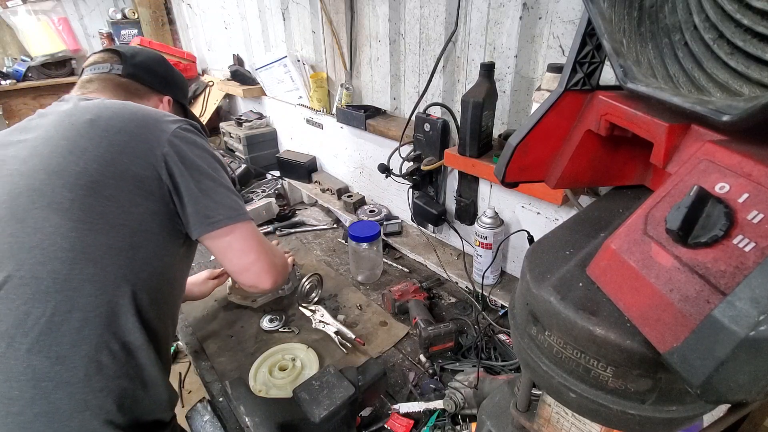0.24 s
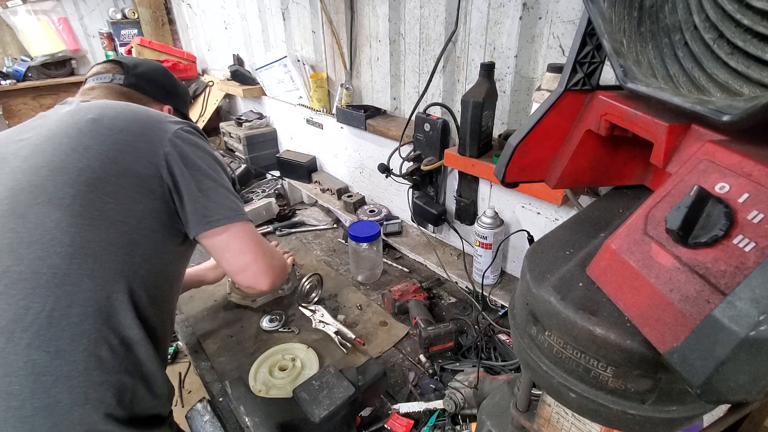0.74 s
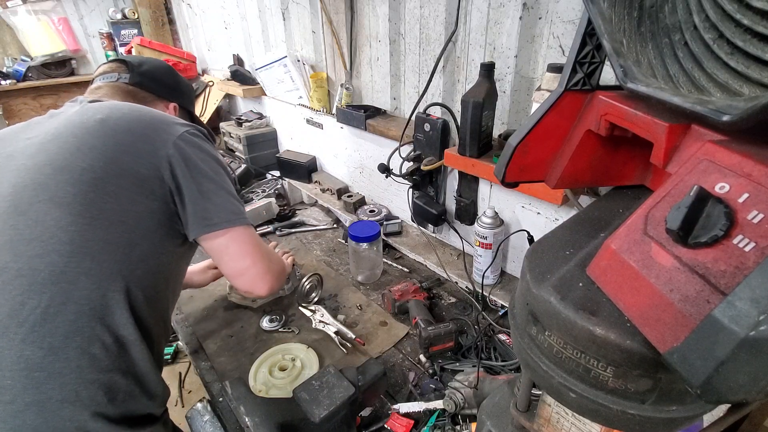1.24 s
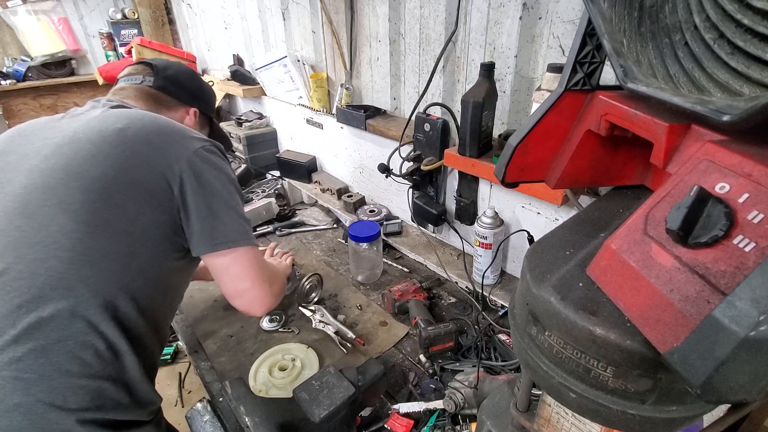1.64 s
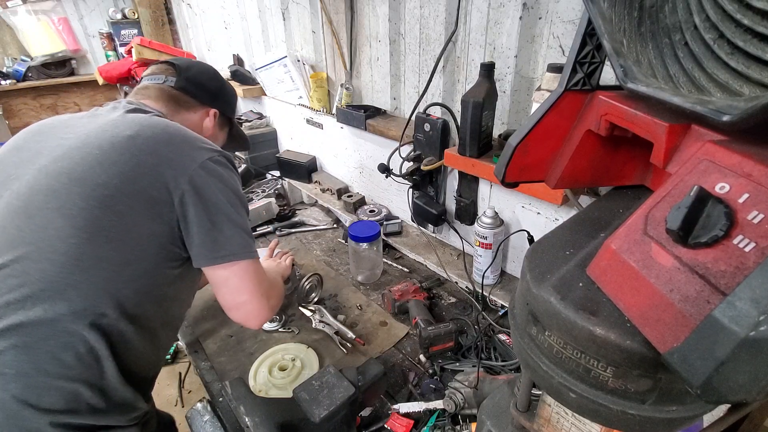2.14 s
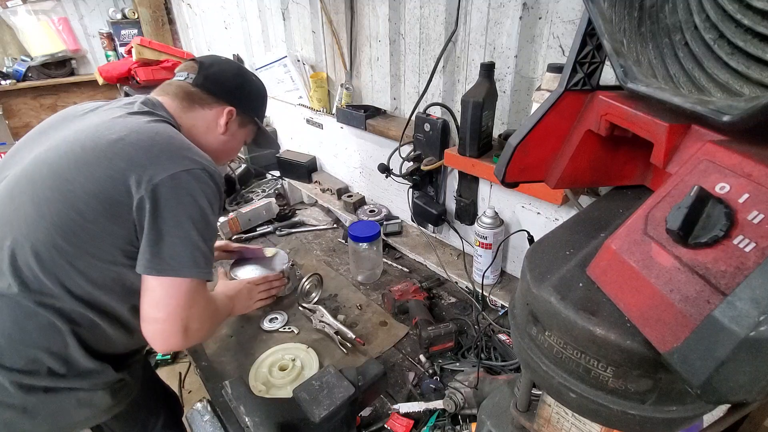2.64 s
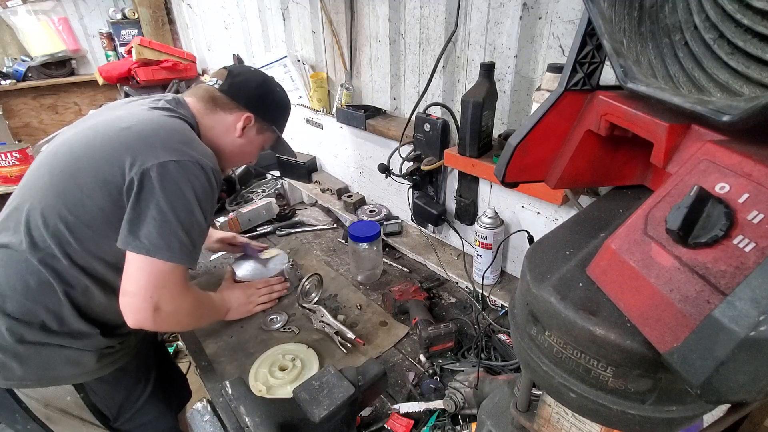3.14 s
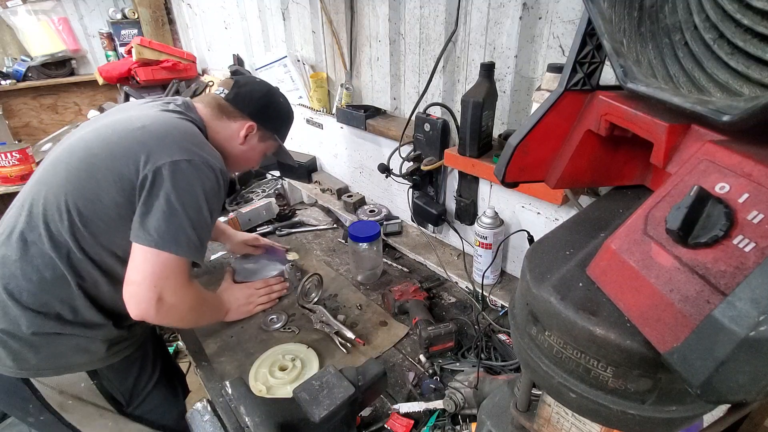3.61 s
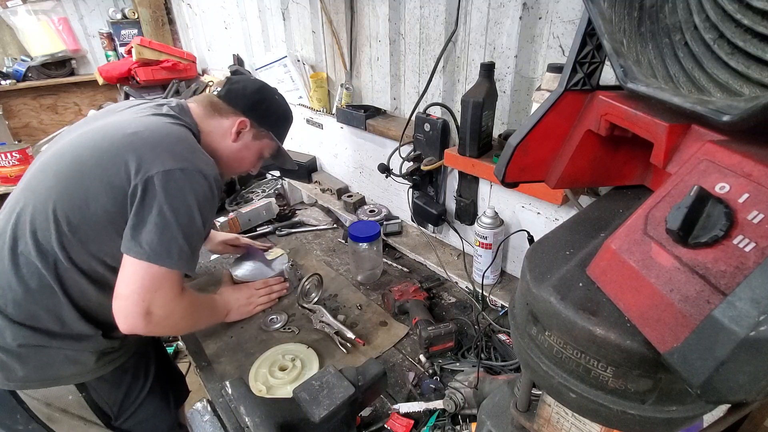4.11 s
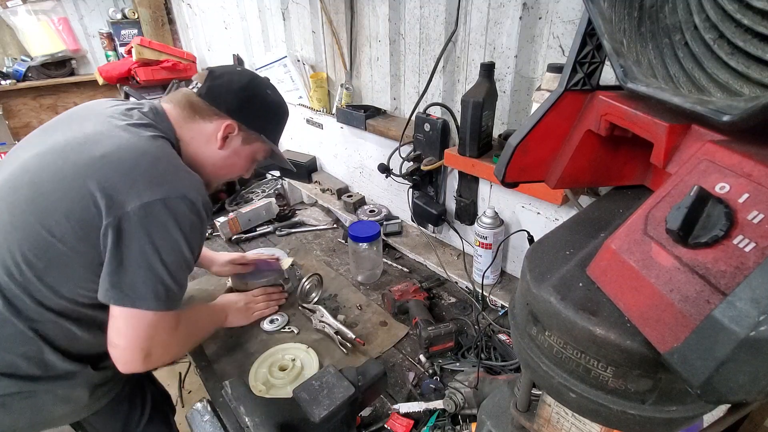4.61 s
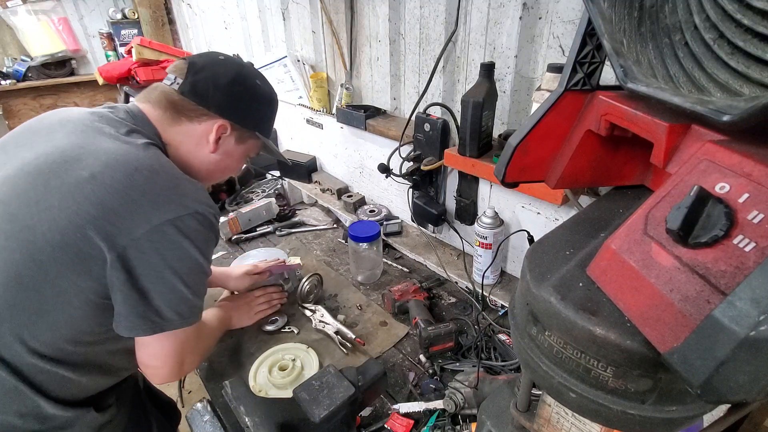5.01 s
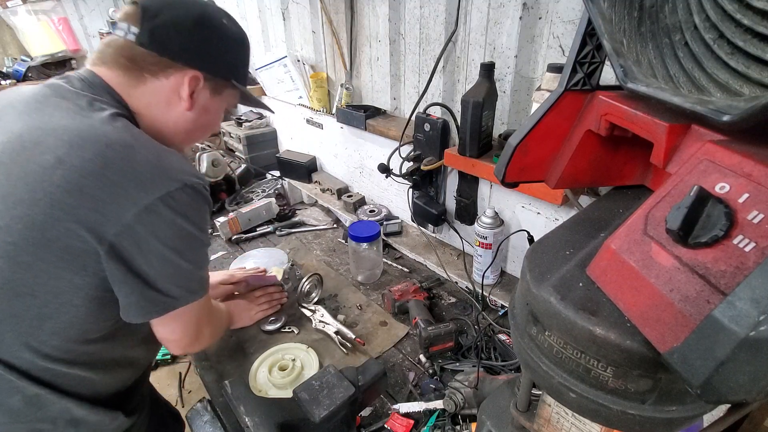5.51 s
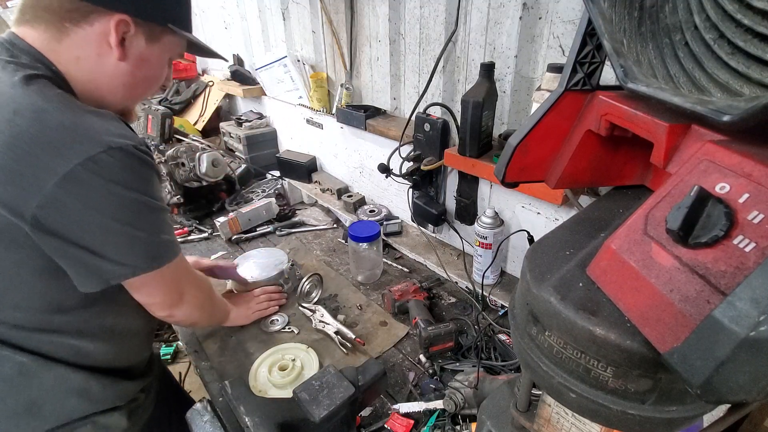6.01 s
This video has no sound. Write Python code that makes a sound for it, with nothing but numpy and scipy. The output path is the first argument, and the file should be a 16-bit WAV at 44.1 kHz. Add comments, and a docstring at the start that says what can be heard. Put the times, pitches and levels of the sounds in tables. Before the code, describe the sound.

In a small workshop, sandpaper scrubs a domed metal cover by hand, about six strokes a second in alternating directions. Each stroke is a bright gritty hiss with a light metallic ring. Early on the cover clacks against the bench and squeaks briefly; midway the strokes grow louder and cleaner, then pause slightly and turn rougher. The last stroke fades slowly. A low mains hum and rumble continue behind. Close single microphone, short dense room.

```python
"""A domed metal cover is sanded by hand on a workbench, in quick back-and-forth strokes, for six seconds.
Throughout, fine grit hisses as filtered noise and coarse grit rings the cover as random blows on resonators.
From about one second on, stick-slip squeaks, judder and knocks of the cover on the bench come and go;
the knocks become rare and faint before the hand lifts off in a last, slowly fading stroke.
Behind it all a mains-driven machine hums and rumbles as sine lines and coloured noise; one microphone."""
import sys
import numpy as np
from scipy import signal
from scipy.fft import rfft, irfft
from scipy.io import wavfile
from scipy.ndimage import map_coordinates

SR = 44100
rng = np.random.default_rng(int(sys.argv[2]) if len(sys.argv) > 2 else 0)


def wav_out(sig):
    """Save sig, one row per channel (or a flat mono array), as 16-bit PCM at SR to the path in sys.argv[1]."""
    wavfile.write(sys.argv[1], SR, np.round(np.clip(np.atleast_2d(sig).T, -1, 1) * 32767).astype(np.int16))


N = 276066
TIME = np.arange(N) / SR


def from_db(db):
    """Logarithmic level: decibels to amplitude gain."""
    return 10 ** (np.asarray(db) / 20)


def rms_one(x):
    """Normalisation: scale to unit rms."""
    return x / np.sqrt(np.mean(x ** 2) + 1e-20)


def in_time(curve):
    """Linear interpolation: each column of a time table at every sample."""
    s, *columns = np.transpose(curve)
    return [np.interp(TIME, s, column) for column in columns]


def swell(middle_s, half_s):
    """Smooth envelope: a short flat-topped rise and fall."""
    distance = np.minimum(np.abs(TIME - middle_s) / half_s, 4)
    return np.exp(-.5 * distance ** 4)


def flutter(per_s):
    """Bounded random modulation: lines between random values, at unit rms."""
    knots = rng.uniform(-1, 1, N // 20)
    return rms_one(np.interp(TIME * per_s, np.arange(len(knots)), knots))


def grains(per_s, spread_db):
    """Random impulse train: grit catches at chance moments with uneven force; rms 1."""
    force_db = spread_db * np.minimum(rng.exponential(1, N), 4)
    sizes = from_db(force_db) * rng.choice([-1, 1], N)
    return rms_one(sizes * (rng.random(N) < per_s / SR))


def coloured(x, spectrum):
    """Spectral shaping: weight a steady signal's frequencies; rms 1."""
    hz, db = np.transpose(spectrum)
    bins = np.maximum(np.arange(N // 2 + 1) * SR / N, 1)
    gain = from_db(np.interp(np.log(bins), np.log(hz), db))
    return rms_one(irfft(rfft(x) * gain, N))


def resonate(x, modes):
    """Modal superposition: damped two-pole resonances in parallel."""
    out = np.zeros(N)
    for hz, width, db in modes:
        r = np.exp(-np.pi * width / SR)
        poles = [1, -2 * r * np.cos(2 * np.pi * hz / SR), r * r]
        # the tiny offset keeps the filter away from denormal numbers
        mode = (1 - r * r) / 2 * signal.lfilter([1, 0, -1], poles, x + 1e-18)
        out += from_db(db) * mode
    return out


def travelling(x, modes, wander_db):
    """Varying modal excitation: each resonance swells and fades as the paper travels over the metal."""
    return sum(resonate(x, [mode]) * from_db(wander_db * flutter(per_s=16)) for mode in modes)


# pushes and pulls in turn, a push first: start_s (break-away), rise_s (speeding up), hiss_db (relative)
STROKES = [(-.052, .035, -26), (0.087, 0.015, -26), (0.235, 0.06, -24), (0.366, 0.047, -26),
           (.519, 0.06, -24.5), (.659, 0.05, -27.5), (0.819, 0.072, -22.5), (.97, 0.07, -22.5),
           (1.12, .025, -25.5), (1.288, 0.017, -26.5), (1.437, 0.081, -22.5), (1.61, .004, -25),
           (1.779, 0.061, -23.5), (1.943, 0.048, -24.5), (2.11, .04, -24), (2.254, 0.022, -26),
           (2.416, 0.052, -23), (2.612, 0.046, -26), (2.805, 0.054, -21), (2.989, 0.031, -22),
           (3.148, 0.054, -19.5), (3.297, 0.011, -20), (3.442, .037, -19.5), (3.576, 0.017, -20),
           (3.715, .04, -20), (3.862, .012, -20.5), (4.007, 0.053, -20.5), (4.174, 0.016, -23),
           (4.345, .11, -24), (4.722, 0.081, -20.5), (4.902, 0.016, -21.8), (5.067, 0.038, -25),
           (5.249, 0.022, -24), (5.386, 0.0057, -22), (5.541, 0.034, -24.5), (5.722, 0.05, -23.5),
           (5.947, 0.051, -24)]
LAST_STROKE_END_S = 6.223
# the hand brakes harder at the end of a push than of a pull, and lifts off slowly after the last stroke
PUSH_BRAKE_S, PULL_BRAKE_S, LIFT_OFF_S = 0.051, .065, .125
# the paper bites as a pull breaks away: extra hiss and its decay time
BITE_DB, BITE_S = 1.5, 0.012


def hand(slip_s=0.002, first_speed=0.43):
    """Kinematics of a reversing stroke: relative speed, place (-.5 rim side, .5 crown), hiss level in dB."""
    rows = np.array(STROKES)
    turns = np.append(rows[:, 0], LAST_STROKE_END_S)
    k = np.clip(np.searchsorted(turns, TIME) - 1, 0, len(rows) - 1)
    start, rise, hiss_db = rows[k].T
    pushing = k % 2 == 0
    since = np.maximum(TIME - start, 0)
    left = turns[k + 1] - TIME
    # the paper sticks at the turn, breaks away at once, then gathers speed
    breaking_away = 1 - np.exp(-since / slip_s)
    gathering = first_speed + (1 - first_speed) * np.sin(np.pi / 2 * np.clip(since / rise, 0, 1))
    brake = np.select([k == len(rows) - 1, pushing], [LIFT_OFF_S, PUSH_BRAKE_S], PULL_BRAKE_S)
    slowing = np.sin(np.pi / 2 * np.clip(left / brake, 0, 1)) ** 2
    speed = breaking_away * gathering * slowing
    progress = np.clip(since / (since + left), 0, 1)
    place = (progress - .5) * np.where(pushing, 1, -1)
    bite_db = np.where(pushing, 0, BITE_DB * np.exp(-since / BITE_S))
    return speed + 1e-6, place, hiss_db + bite_db


# spectrum of the even hiss of fine grit: pitch_hz, level_db (per Hz, relative)
GRIT = [(200, -22), (600, -29.5), (1000, -23), (1500, -28), (2500, -6.5), (3100, -2.5), (4300, 1),
        (5300, 3.5), (6000, 1), (7000, 2.5), (8300, 2.5), (9900, -6), (12000, -8)]
# broad resonances of the paper under the fingers: pitch_hz, width_hz, level_db (relative)
PAPER = [(2050, 450, -3), (3380, 260, 0), (3756, 600, 0), (4925, 810, 1.5), (6680, 550, 0.5),
         (7330, 760, -13.5), (9000, 430, -1)]


def hiss(speed, hiss_db, treble_db, level_db=2.0, paper_db=0.0, split_hz=5500, uneven_db=1.0, bright_db=-1.5):
    """Friction noise of countless grains: treble grows more steeply with speed, so mid-stroke is brightest."""
    fine = coloured(grains(per_s=18000, spread_db=0.0), GRIT)
    paper = rms_one(travelling(grains(per_s=10000, spread_db=2.0), PAPER, wander_db=4.5))
    both = rms_one(fine + from_db(paper_db) * paper)
    low = signal.sosfiltfilt(signal.butter(2, split_hz, fs=SR, output="sos"), both)
    treble = (both - low) * from_db(treble_db + bright_db)
    stroke = low * speed ** 0.91 + treble * speed ** 2.64
    return from_db(level_db + hiss_db + uneven_db * flutter(per_s=110)) * stroke


# resonances of the hand-damped cover, before the grip shifts them: pitch_hz, width_hz, level_db (relative)
COVER = [(1610, 67, -3), (1883, 65, 6), (2015, 94, 8.5), (2255, 98, 9), (2390, 55, -30.5),
         (2764, 270, -1.5), (3080, 79, -4.5), (3980, 130, -11), (4470, 100, -40)]


def coarse_grit(speed, coarse_db, pitch, level_db=-3.0, uneven_db=2.5, shift=.015):
    """Impulsive modal excitation: larger grains ring the cover; the moving grip shifts its pitch a little."""
    ring = travelling(grains(per_s=2800, spread_db=2.0), COVER, wander_db=2.0)
    ring = signal.sosfilt(signal.butter(2, 1300, "high", fs=SR, output="sos"), ring)
    # reading the ring faster or slower raises or lowers its pitch
    position = np.cumsum(pitch + shift * flutter(per_s=15))
    gripped = map_coordinates(ring, [position], order=3, mode="wrap")
    level = from_db(level_db + coarse_db + uneven_db * flutter(per_s=100))
    return rms_one(gripped) * speed ** 0.71 * level


# a push that starts at the rim catches briefly
CATCH_DELAY_S, CATCH_HALF_S = 0.02, .016


def catches(reach):
    """Momentary sticking: the paper catches just after each push begins, much harder nearer the rim."""
    return reach ** 2 * sum(swell(start + CATCH_DELAY_S, CATCH_HALF_S) for start, _, _ in STROKES[::2])


# the paper sticks and slips with a ringing rasp: middle_s, half_length_s, pitch_hz (mean), level_db (relative)
SQUEAKS = [(1.036, 0.011, 4500, -25), (1.077, .0025, 2390, -19), (1.157, 0.0094, 4500, -23.5),
           (1.163, 0.016, 2000, -21), (3.947, 0.015, 2050, -27.5), (4.545, .05, 3380, -26),
           (5.181, .0056, 3450, -20.5), (5.188, 0.0026, 4610, -16), (6.019, .012, 2000, -26)]
CATCH_HZ, CATCH_SQUEAK_DB = 2080, -21.5


def squeaks(catch, level_db=0.5, jitter=.085, rough_db=3.5):
    """Stick-slip oscillation near one resonance: a rough tone whose pitch never holds still."""
    cycles = np.cumsum(1 + jitter * flutter(per_s=1000)) / SR
    rough = np.sqrt(2) * rms_one(from_db(rough_db * flutter(per_s=1400)))
    tones = from_db(CATCH_SQUEAK_DB) * catch * np.sin(2 * np.pi * CATCH_HZ * cycles)
    for middle, half, hz, db in SQUEAKS:
        tones += from_db(db) * swell(middle, half) * np.sin(2 * np.pi * hz * cycles)
    return from_db(level_db) * rough * tones


# the paper drags and the cover judders: middle_s, half_length_s, bench_db (relative), rasp_db (relative)
JUDDERS = [(1.188, 0.013, -28, -37), (2.169, 0.0054, -22.5, -24), (4.663, 0.04, -33.5, -43),
           (4.833, 0.0048, -26, -35), (5.138, 0.0064, -26.5, -32), (5.202, 0.022, -24.5, -40),
           (5.293, .013, -31.5, -21), (5.588, .015, -28.5, -16.5), (5.63, 0.0087, -29.5, -30),
           (5.834, 0.023, -23.5, -18), (6.044, 0.033, -23, -16.5)]
# resonances of the bench under the cover: pitch_hz, width_hz, level_db (relative)
BENCH = [(504, 51, 2), (599, 37, -4.5), (777, 96, 5.5), (924, 110, 0), (1090, 9.2, -6.5), (1370, 230, -5)]
# dull thud of the cover's rim against the bench: pitch_hz, width_hz, level_db (relative)
THUD = [(321, 113, 7), (428, 150, -6)]
# share of each catch that shakes the bench and that rasps
CATCH_BENCH_DB, CATCH_RASP_DB = -27, -38.5


def judder(speed, catch, bench_db, thud_db, level_db=-4.5, rasp_db=-5.5,
           rattle_db=-4.5, rattle_hz=1300, rattle_width_hz=900):
    """Coupled vibration: rubbing shakes the bench through the cover; where the paper drags it rattles and rasps."""
    rocking = from_db(CATCH_BENCH_DB) * catch
    drag = from_db(CATCH_RASP_DB) * catch
    for middle, half, rock_db, drag_db in JUDDERS:
        burst = swell(middle, half)
        rocking += from_db(rock_db) * burst
        drag += from_db(drag_db + rasp_db) * burst
    shake = np.hypot(speed ** 0.24 * from_db(bench_db), rocking)
    taps = grains(per_s=1500, spread_db=1.5)
    bench = travelling(taps * shake, BENCH, wander_db=2.5) / np.std(resonate(taps, BENCH))
    thud = resonate(taps * shake * from_db(thud_db), THUD) / np.std(resonate(taps, THUD))
    # the rocking rim chatters against the bench top
    rim = [(rattle_hz, rattle_width_hz, 0)]
    chatter = rms_one(resonate(resonate(grains(per_s=1200, spread_db=6.5), rim), rim))
    rattle = from_db(rattle_db) * rocking * chatter
    rasp = drag * rms_one(resonate(grains(per_s=4700, spread_db=2.5), PAPER))
    return from_db(level_db) * (bench + thud + rattle) + rasp


# the cover knocks on the bench: start_s, level_db (first touch, relative)
KNOCKS = [(0.859, -6), (1.0745, -4.5), (1.0768, -15), (1.133, -10), (1.141, -8), (1.4311, -1.5),
          (1.7646, -9.5), (2.056, -7.5), (2.168, -13), (2.373, -9), (4.653, -20), (5.214, -19.5)]


def knocks(level_db=-1.0, bench_db=-9.5, contact_hz=3200, rim_hz=2000, rim_width_hz=240, rim_db=-2.0,
           bounce_s=.0016, bounce_db=-5.0, count=4):
    """Impact and rebound: the rim drops, and a clack with quick, dying bounces rings cover and bench."""
    contact = signal.butter(4, contact_hz, fs=SR, output="sos")
    blow = signal.sosfilt(contact, signal.unit_impulse(N) + 1e-18)
    clack = resonate(blow, COVER + [(rim_hz, rim_width_hz, rim_db)])
    ring = (clack + from_db(bench_db) * resonate(blow, BENCH))[:SR // 10]
    blows = np.zeros(N)
    all_gaps = rng.uniform(.5, 2, (len(KNOCKS), count))
    for (s, db), gaps in zip(KNOCKS, all_gaps):
        touches = s + bounce_s * (np.cumsum(gaps) - gaps[0])
        touch_db = db + level_db + bounce_db * np.arange(count)
        blows[np.round(touches * SR).astype(int)] += from_db(touch_db)
    return signal.fftconvolve(blows, ring / np.abs(ring).max())[:N]


def workshop(x, t60=0.23, room_db=-11.5, first_echo_s=0.0026, moves_per_s=9.0, count=8):
    """Reverberation: a short, dense tail whose reflections keep changing as hand and body move."""
    t, wet = TIME[:SR // 3], np.zeros(N)
    for k in range(count):
        tail = rng.standard_normal(len(t)) * from_db(-60 * t / t60) * (t > first_echo_s)
        # the tails take turns, each cross-fading into the next
        away = np.abs((TIME * moves_per_s - k) % count - count / 2)
        share = np.cos(np.pi / 2 * np.minimum(away, 1))
        wet += signal.fftconvolve(x * share, tail / np.linalg.norm(tail))[:N]
    return x + from_db(room_db) * wet


# mains hum, before its slight waver: pitch_hz, level_db (rms)
HUM = [(60, -28), (120, -42), (240, -50.5)]
# spectrum of the machine's low rumble in the room: pitch_hz, level_db (per Hz, relative)
RUMBLE = [(20, -35), (40, -25), (48, -16.5), (58, -3), (80, -3), (95, 1), (110, -3), (130, -1.5), (165, -9),
          (200, -14.5), (400, -25), (1000, -27.5), (4000, -40.5), (11000, -46.5)]
RUMBLE_DB = -37  # rms


def machine(waver=0.034):
    """Harmonic and broadband radiation: mains lines, wavering slightly in level, over a low rumble."""
    lines = np.zeros(N)
    for hz, db in HUM:
        lines += from_db(db) * np.sqrt(2) * np.sin(2 * np.pi * (hz * TIME + rng.random()))
    rumble = from_db(RUMBLE_DB) * coloured(rng.standard_normal(N), RUMBLE)
    return lines * (1 + waver * flutter(per_s=7.0)) + rumble


# level of the machine's wavering drone: start_s, level_db (rms)
DRONE = [(0, -35.5), (.3, -34.5), (1.4, -45), (2.0, -38), (3.1, -33.5), (3.6, -41), (5.2, -50), (6.25, -50)]
# the resonance that carries the drone: pitch_hz, width_hz, level_db (relative)
DRONE_MODE = [(139.4, 9.8, 0)]


def drone(level_db=0.0):
    """Narrow-band resonance: noise filtered twice by one mode, swelling and fading."""
    band = rms_one(resonate(resonate(rng.standard_normal(N), DRONE_MODE), DRONE_MODE))
    return band * from_db(level_db + in_time(DRONE)[0])


# how the paper lies on the dome:
# start_s, reach (towards the rim, 0-1), coarse_db (relative), treble_db (relative)
GRIP = [(0, 0.68, -24, -.5), (.6, 0.82, -24.5, -3), (1.2, 0.95, -21, -3), (1.6, 0.74, -27.5, -0.5),
        (2.2, 1, -27.5, -1), (2.72, 0.18, -34.5, 0), (3.45, 0.74, -23.5, 0.2), (3.9, 0.73, -22.5, -1.8),
        (4.35, 0.06, -27.5, -0.7), (5.25, 0.23, -36, -1.5), (6.0, 0.43, -26.5, 4.2)]
# how the cover sits on the bench:
# start_s, bench_db (ring, relative), thud_db (against the ring), pitch (factor of the gripped cover)
CONTACT = [(0, -37.5, -9, 1.015), (1.1, -35.5, -5.5, 1.03), (2.2, -41.5, -3, 1.02), (2.7, -44.5, -2, 1.04),
           (3.1, -42.5, 1.5, 0.93), (3.55, -45.5, 2, 1.03), (4.0, -40.5, -3.5, 1.0), (4.5, -44.5, -4, 0.95),
           (5.0, -38, -7, .91), (5.6, -35.5, -9, 0.92), (6.2, -39.5, -19, 0.95)]
# from rim to crown the hiss grows and brightens and the coarse grit fades; reach scales the last two
CROWN_HISS_DB, CROWN_TREBLE_DB, CROWN_COARSE_DB = 0.5, 3.5, -6.5


def scene():
    """Superposition: the sanding in its room, over the hum; both channels alike."""
    speed, place, hiss_db = hand()
    reach, coarse_db, treble_db = in_time(GRIP)
    bench_db, thud_db, pitch = in_time(CONTACT)
    reach = np.clip(reach, 0, 1)
    catch = catches(reach)
    fine = hiss(speed, hiss_db + CROWN_HISS_DB * place, treble_db + CROWN_TREBLE_DB * reach * place)
    coarse = coarse_grit(speed, coarse_db + CROWN_COARSE_DB * reach * place, pitch)
    cover = judder(speed, catch, bench_db, thud_db) + knocks()
    sanding = workshop(fine + coarse + squeaks(catch) + cover)
    return np.tile(sanding + machine() + drone(), (2, 1))


CUTOFF_HZ = 10100


def record(dry):
    """Band limiting: the recorder cuts the top steeply."""
    return signal.sosfilt(signal.ellip(10, .2, 70, CUTOFF_HZ, fs=SR, output="sos"), dry)


dry = scene()
out = record(dry)
wav_out(out)
```